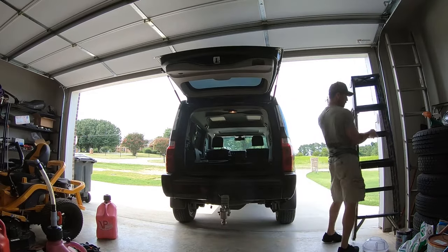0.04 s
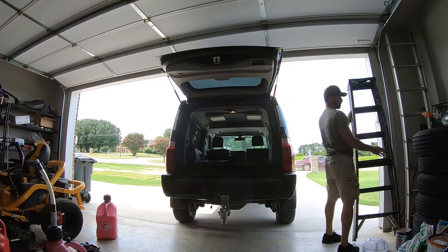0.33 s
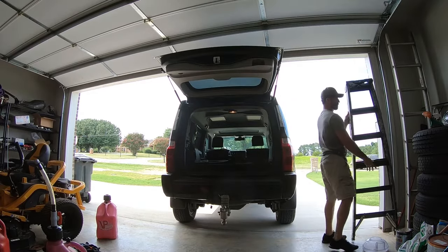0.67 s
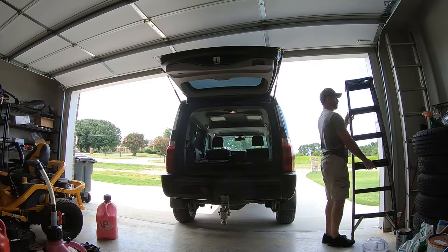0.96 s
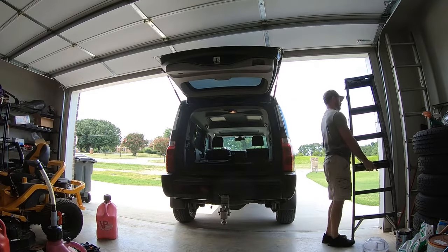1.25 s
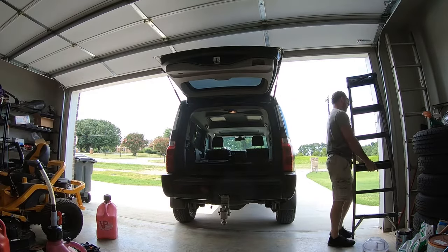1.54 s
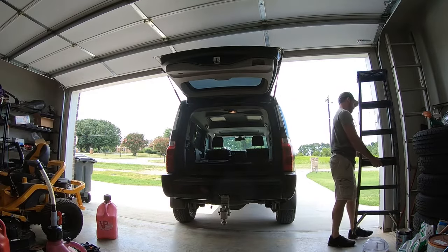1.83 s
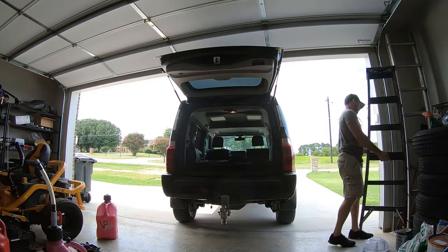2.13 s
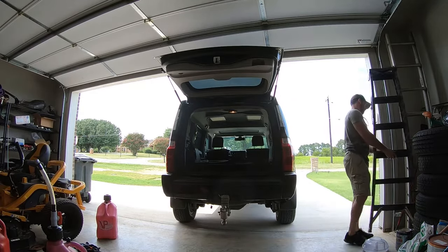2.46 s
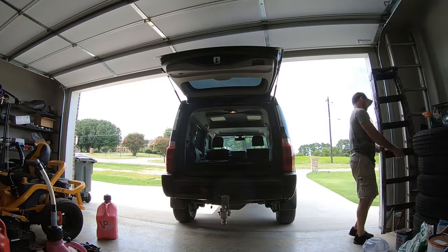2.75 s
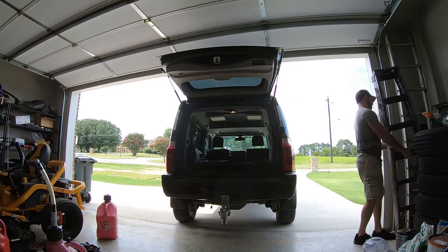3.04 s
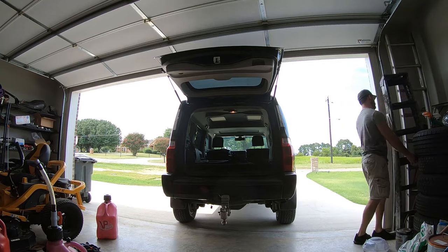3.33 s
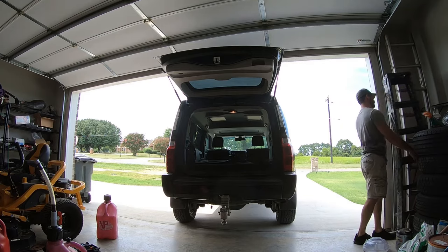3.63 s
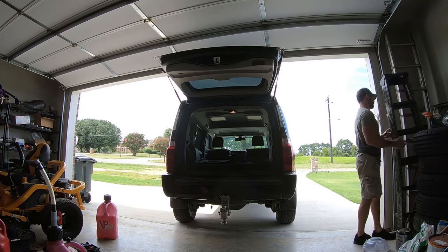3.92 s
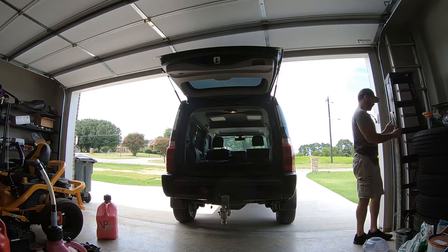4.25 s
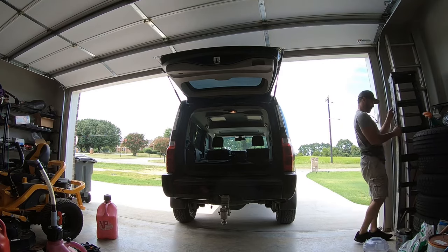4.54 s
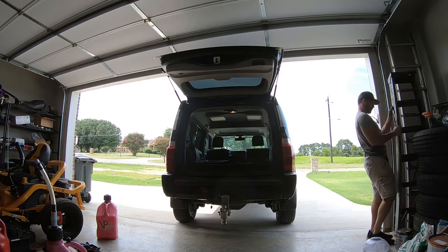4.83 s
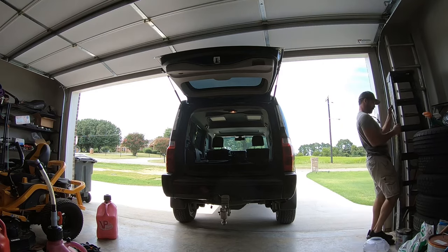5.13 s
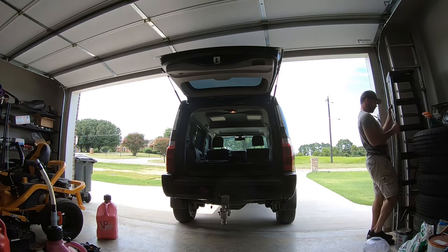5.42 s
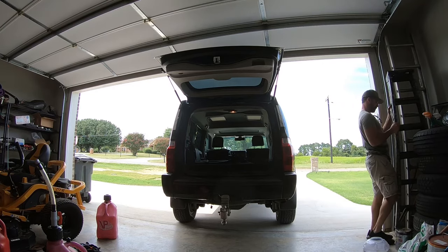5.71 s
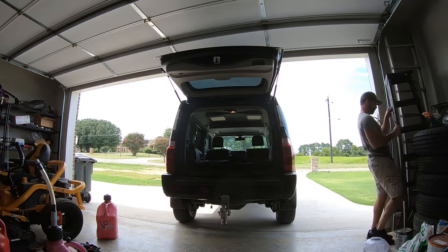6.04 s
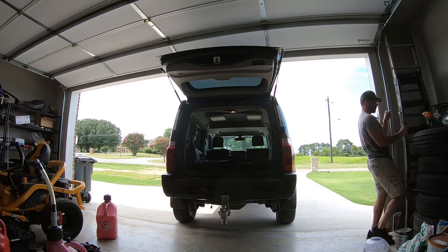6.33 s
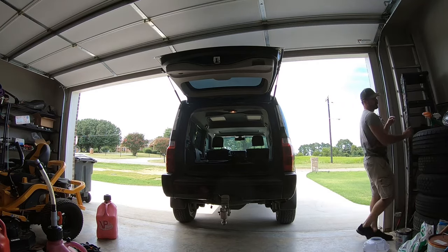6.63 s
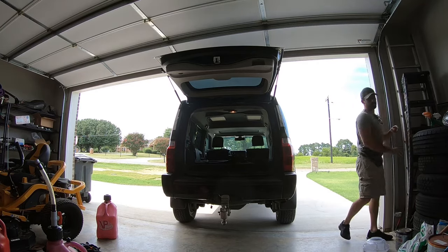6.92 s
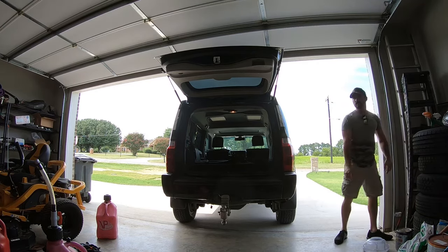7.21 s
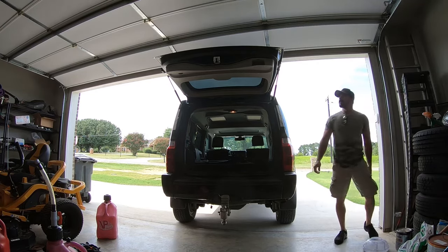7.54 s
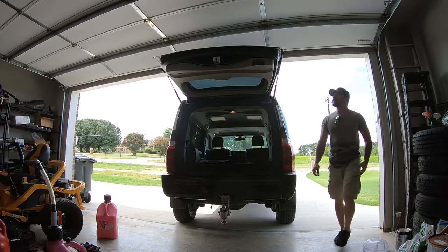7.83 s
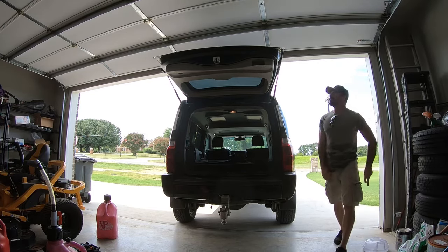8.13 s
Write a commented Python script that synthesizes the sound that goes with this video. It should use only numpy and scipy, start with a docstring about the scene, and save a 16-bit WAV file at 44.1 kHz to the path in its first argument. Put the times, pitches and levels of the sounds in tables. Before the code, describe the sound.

A vehicle is heard on the road outside an open garage, its engine and tyres fading over the first couple of seconds. Shoes scuff lightly on concrete, and at about 0.6 seconds a metal stepladder's brace snaps shut with a ringing clank. A faint scrape follows near 1.4 seconds. At 2.5 seconds the ladder's feet scrape and it knocks, then clanks hardest at 3 seconds, with two duller bumps just after. Another knock comes at 4.4 seconds, followed by brief high hinge squeaks, a scrape and clatter around 5 seconds. From 6 to 6.8 seconds the ladder is jostled into place with scrapes, a squeak and several lighter thuds. Each blow rings briefly in the bare room. Low wind buffets the microphone at about 5.2 seconds and more strongly at 6.2. A few soft shoe scuffs close it out near 8 seconds over quiet outdoor air.

```python
"""Stepladder in an open garage.

A metal stepladder is folded, carried to the wall and jostled into place. Its brace snaps shut, its
rails clank and ring, its feet scrape and a dry hinge squeaks. Shoes scuff on the concrete; the bare
room rings after each blow. Outside, a vehicle fades down the road. Wind through the door sways at
the microphone, then buffets it in later gusts."""
import sys
import numpy as np
from scipy import signal
from scipy.fft import rfft, irfft, next_fast_len
from scipy.io import wavfile
from scipy.ndimage import uniform_filter1d

SR = 44100
rng = np.random.default_rng(int(sys.argv[2]) if len(sys.argv) > 2 else 0)


def waveform_to_disk(signal):
    """Save audio, clipped to [-1, 1], as 16-bit WAV at the path in sys.argv[1]."""
    frames = np.transpose(np.atleast_2d(signal))
    scaled = np.clip(frames, -1, 1) * 32767
    samples = np.round(scaled).astype(np.int16)
    wavfile.write(sys.argv[1], SR, samples)


N = 360297
BAND_HZ = 1000 * 2 ** (np.arange(-11, 13) / 3)

# Engine, road roar, tyres. Each row: initial level in dB, fade in dB per second, wall loss in dB.
VEHICLE_LAYERS = [(-39.5, 4.5, 2), (-33.5, 3, 17), (-41.5, 3, 5.5)]
# Outdoor noise spectra. Each row: frequency in Hz, relative density in dB.
ENGINE_SPECTRUM = [(80, -4), (130, -3), (185, 3.5), (240, 7.5), (310, -4.5), (420, -6.5), (900, -51)]
ROAR_SPECTRUM = [(200, -3), (380, 1), (620, 0.5), (850, 0.5), (1150, -7), (2200, -26.5), (3200, -19.5),
                 (4200, -32.5), (5600, -29.5), (10000, -49.5), (15000, -56)]
TYRE_SPECTRUM = [(500, -60), (800, 5), (1050, 5.5), (1400, -2.5), (2000, -9.5), (3200, -17), (6000, -31.5),
                 (12000, -73)]
AIR_SPECTRUM = [(24, -28), (40, -9.5), (75, -2.5), (213, -5.5), (399, -16.5), (674, -20), (932, -21.5),
                (1430, -15.5), (1660, -22.5), (3170, -13), (4180, -22.5), (5360, -18), (6390, -24),
                (14600, -30), (15700, -34)]
BUFFET_SPECTRUM = [(24, 11.5), (45, -2.5), (62, -11), (85, -24.5), (125, -39.5), (250, -65), (600, -100)]
# Wind strength. Each row: time in seconds, relative sway in dB, relative buffeting in dB.
GUSTS = [(0.0, -48, -50), (0.11, -25.5, -49.5), (1.77, -59, -66), (2.3, -38, -71), (2.61, -64, -63),
         (4.71, -48.5, -70.5), (5.09, -25, -65), (5.16, -15.5, -28), (5.44, -21, -27), (5.48, -13.5, -34),
         (6.1, -32, -60), (6.21, -9, -20.5), (6.67, -30, -44.5), (6.85, -20, -42), (7.12, -32.5, -69.5),
         (7.51, -27, -57), (7.74, -26, -79), (8.17, -73, -60.5)]
# Friction strokes. Each row: start in seconds, length in seconds, level in dB.
SCUFFS = [(.168, .018, -48.5), (.328, 0.015, -46.5), (.772, 0.022, -48.5), (1.163, 0.02, -54),
          (1.42, 0.14, -58.5), (2.92, .06, -52), (4.13, .045, -55.5), (4.675, 0.044, -45),
          (7.372, .042, -54.5), (7.94, .04, -53.5), (8.03, 0.054, -56)]
SNAPS = [(.57, 0.011, -22)]
SCRAPES = [(1.412, 0.034, -46), (1.462, 0.03, -43.5), (2.478, 0.13, -40.5), (4.881, 0.1, -43.5),
           (5.662, 0.21, -57.5), (5.983, 0.24, -51), (6.264, 0.042, -41), (6.287, 0.13, -39.5),
           (6.49, 0.22, -52.5)]
# Friction spectra. Each row: frequency in Hz, relative density in dB.
SCUFF_SPECTRUM = [(150, -7), (600, -0.5), (1600, -2), (3200, 8.5), (4200, -2), (5600, 1), (9000, -9.5),
                  (15000, -21)]
SNAP_SPECTRUM = [(700, -11), (1170, 5), (1500, -14), (2600, -13), (3000, -2), (3450, -2), (4000, -12),
                 (5700, -7.5), (9000, -23), (15000, -40)]
SCRAPE_SPECTRUM = [(150, -34), (330, -1.5), (450, 9), (750, 5.5), (1500, 4.5), (2400, 2), (4200, -6),
                   (5500, -11.5), (9000, -18), (15000, -29.5)]
JUDDER_SPECTRUM = [(300, -29), (400, -3), (490, 2.5), (560, -3.5), (700, -33), (2000, -55)]
# Garage decay. Each row: frequency in Hz, T60 in seconds.
ROOM_T60_S = [(200, 0.72), (1000, 0.49), (3000, 0.46), (6000, 0.45), (12000, 0.46)]
# Blows on the ladder. Each row: start in seconds, relative level in dB,
# hardness (0 rubber foot, about 1 bare metal), low thud in dB.
KNOCKS = [(0.571, -25, 0.49, -12), (2.566, -27, 0.32, -14), (3.035, -22.5, 0.93, -7.5),
          (3.097, -33, 0.15, -26), (3.168, -32, 0.041, -11), (3.676, -47, 1.16, -3),
          (3.866, -48, 0.95, -21), (4.407, -27, 0.15, -18.5), (4.777, -45.5, 0.32, -21),
          (4.915, -34, 0.41, -8.5), (4.985, -32, 0.97, -15), (5.343, -49.5, 0.2, -12),
          (5.431, -49.5, 0.31, -2), (6.056, -44, 0.62, 0), (6.173, -37.5, 0.31, -15),
          (6.348, -46, 0.87, -3), (6.388, -40, 0.18, 6), (6.52, -39.5, 0.31, -11), (6.627, -32, 0, -5),
          (6.775, -51, 0.98, -11), (6.803, -42, 0.38, -16)]
# Contact colours. Each row: frequency in Hz, gain in dB.
SOFT_CONTACT = [(470, 0), (800, -4), (1400, -1), (2100, -3.5), (3000, -13), (5500, -19.5), (10000, -25.5)]
HARD_CONTACT = [(470, -5.5), (800, -4.5), (1400, 2.5), (2100, 2), (3000, 4), (5500, 3), (10000, -2.5)]
# Dense, short-lived frame modes. Each row: frequency in Hz, relative density in dB.
FRAME_SPECTRUM = [(110, -6), (210, 7.5), (320, 6), (450, 2), (700, 6), (1250, 3.5), (1800, -0.5), (2400, 0),
                  (3150, 4.5), (4000, -4.5), (5400, 0.5), (7000, -12.5), (10000, -14), (15000, -38)]
# Rail and step modes. Each row: frequency in Hz, relative level in dB, T60 in seconds.
LADDER_MODES = [(425, 3.5, .7), (462, 0, .35), (633, -.5, .55), (782, -3, .4), (841, .5, .55),
                (1206, 0, .38), (1282, -3, .4), (1350, -3, .4), (1402, -3, .4), (1472, -3, .35),
                (1587, -4, .4), (2069, -2, .38), (2353, -4, .18), (2490, -4, .18), (2666, -2, .38),
                (2709, -2, .38), (2864, -3, .35), (2975, -5, .35), (3049, -3, .42), (3578, -9, .33),
                (4200, -10, .3), (5351, -5, .26), (8750, -13, .2)]
# Hinge slips. Each row: start in seconds, length in seconds, initial pitch in Hz, level in dB.
SQUEAKS = [(4.696, 0.0087, 2410, -40), (4.705, 0.015, 2390, -29), (4.781, 0.0079, 2300, -44),
           (4.888, 0.0184, 2340, -41), (6.27, 0.062, 2270, -36.5), (6.345, 0.021, 2334, -28)]


def from_db(db):
    return 10 ** (np.asarray(db) / 20)


def unit_rms(x):
    return x / np.sqrt(np.mean(x ** 2) + 1e-20)


def decay(t, t60_s):
    return from_db(-60 * t / t60_s)


def at_hz(points, hz):
    """Interpolate on a log-frequency axis."""
    known_hz, values = np.transpose(points)
    return np.interp(np.log(np.maximum(hz, 1)), np.log(known_hz), values)


def add(out, start_s, sound):
    start = max(round(start_s * SR), 0)
    out[start:start + len(sound)] += sound[:N - start]


def butter(x, hz, kind):
    return signal.sosfilt(signal.butter(2, hz, kind, fs=SR, output="sos"), x)


def shaped(x, spectrum):
    """Apply a spectrum, rolled off below its first point; rms 1."""
    size = next_fast_len(len(x))
    hz = np.arange(size // 2 + 1) * SR / size
    gain = from_db(at_hz(spectrum, hz)) * np.minimum(hz / spectrum[0][0], 1) ** 2
    return unit_rms(irfft(rfft(x, size) * gain, size)[:len(x)])


def noise_bands(size):
    """Independent third-octave noises; unit power per kHz."""
    edge, settle = 2 ** (1 / 6), 4096
    bands = [butter(rng.standard_normal(size + settle), [hz / edge, hz * edge], "band") for hz in BAND_HZ]
    return np.array(bands)[:, settle:] * np.sqrt(SR / 2000)


def vehicle(hidden_s, hiding_s):
    """Engine, road roar and tyres recede behind the doorway's side; the wall shades the roar most."""
    out, t = np.zeros(N), np.arange(N) / SR
    hidden = (1 + np.tanh((t - hidden_s) / hiding_s)) / 2
    spectra = ENGINE_SPECTRUM, ROAR_SPECTRUM, TYRE_SPECTRUM
    for (db, fade_db_per_s, wall_db), spectrum in zip(VEHICLE_LAYERS, spectra):
        gain = from_db(db - fade_db_per_s * t - wall_db * hidden)
        out += gain * shaped(rng.standard_normal(N), spectrum)
    return out


def air(level_db):
    """Still outdoor air: steady, low noise."""
    return from_db(level_db) * shaped(rng.standard_normal(N), AIR_SPECTRUM)


def eddies(rate_hz, unrest):
    """Pressure swings as eddies of uneven size roll past; rms 1."""
    size_drift = unit_rms(butter(rng.standard_normal(N + SR), 16.8, "low")[SR:])
    phase = 2 * np.pi * np.cumsum(rate_hz * np.exp(unrest * size_drift)) / SR
    return unit_rms(np.sin(phase))


def wind(sway_gain_db, buffet_gain_db, calm_hz, gust_hz):
    """Eddies pass faster as the wind rises; the strongest gusts break into low buffeting."""
    times_s, *curves_db = np.transpose(GUSTS)
    sway_db, buffet_db = [np.interp(np.arange(N) / SR, times_s, db) for db in curves_db]
    eddy_hz = np.interp(sway_db, [-24.5, -15.5], [calm_hz, gust_hz])
    turbulence = shaped(rng.standard_normal(N), BUFFET_SPECTRUM)
    turbulence /= np.sqrt(uniform_filter1d(turbulence ** 2, size=3000) + 1e-6)   # gust alone sets level
    sway = from_db(sway_db + sway_gain_db) * eddies(eddy_hz, unrest=0.2466)
    return sway + from_db(buffet_db + buffet_gain_db) * turbulence


def stroke(length_s):
    """Half-sine swell."""
    return np.sin(np.linspace(0, np.pi, max(round(length_s * SR), 8)))


def friction(strokes, spectrum, grit_db):
    """Dense slips of uneven size under each stroke."""
    pressure = np.zeros(N)
    for start_s, length_s, db in strokes:
        add(pressure, start_s, from_db(db) * stroke(length_s))
    slips = rng.standard_normal(N)
    grit = np.repeat(rng.standard_normal(N // 64 + 1), 64)[:N]
    return pressure * shaped(slips * from_db(grit_db * grit), spectrum)


def scuffs():
    """Shoes and hands rub lightly."""
    return friction(SCUFFS, SCUFF_SPECTRUM, grit_db=3.0)


def room_decay(t, first_echo_s):
    """Tail envelope per band: builds after the first echo; bass lasts longest."""
    return decay(t, at_hz(ROOM_T60_S, BAND_HZ)[:, None]) * np.clip(t / first_echo_s - 1, 0, 1)


def garage(x, wet_db):
    """Direct sound plus the dense tail from concrete and walls."""
    t = np.arange(SR) / SR
    tail = np.sum(noise_bands(len(t)) * room_decay(t, first_echo_s=0.004), axis=0)
    return x + from_db(wet_db) * signal.fftconvolve(x, tail / np.linalg.norm(tail))[:N]


def brace_snap():
    """The spreader brace snaps shut in one short burst."""
    return friction(SNAPS, SNAP_SPECTRUM, grit_db=3.5)


def contact_colour(hardness, thud_db):
    """Harder contact is brighter; weight behind it adds a low thud."""
    blend = [(hz, db + hardness * (at_hz(HARD_CONTACT, hz) - db)) for hz, db in SOFT_CONTACT]
    return [(230, thud_db)] + blend


def stray_modes(t, colour, t60_s, count):
    """Each contact point wakes a few modes of its own."""
    hz = rng.uniform(np.sqrt(350), np.sqrt(7000), count) ** 2
    gains = from_db(at_hz(colour, hz) + at_hz(FRAME_SPECTRUM, hz)) * rng.choice([-1, 1], count)
    return gains @ np.sin(2 * np.pi * hz[:, None] * t) * decay(t, t60_s)


def knocks(clatter_db, rail_db, stray_db, room_db, soft_rise_s, hard_rise_s):
    """Each blow clatters the loose frame; the rails ring on and the room answers."""
    out, t = np.zeros(N), np.arange(SR * 11 // 20) / SR
    bands = noise_bands(N + len(t))
    mode_hz, mode_db, mode_t60_s = np.transpose(LADDER_MODES)
    lag_s = 0.012 * 200 / BAND_HZ[:, None]   # low modes build more slowly
    build = 1 - np.exp(-t / lag_s)
    rails = decay(t, mode_t60_s[:, None]) * np.exp(2j * np.pi * mode_hz[:, None] * t)
    tail = from_db(room_db) * room_decay(t, first_echo_s=0.002)
    for start_s, db, hardness, thud_db in KNOCKS:
        colour = contact_colour(hardness, thud_db)
        rivet_chatter_db = np.interp(t, t[::128], rng.normal(0, 0.5, len(t[::128])))
        rattle = unit_rms(from_db(rivet_chatter_db)) * decay(t, t60_s=0.085)
        envelope = np.hypot(rattle, tail) * build
        band_gains = from_db(clatter_db + at_hz(colour, BAND_HZ) + at_hz(FRAME_SPECTRUM, BAND_HZ))
        start = round(start_s * SR)
        clatter = band_gains @ (bands[:, start:start + len(t)] * envelope)
        scatter_db = rng.normal(0, 2.3, len(mode_hz))
        mode_gains = from_db(rail_db + mode_db + at_hz(colour, mode_hz) + scatter_db)
        phasors = np.exp(2j * np.pi * rng.random(len(mode_hz)))
        ring = np.imag(mode_gains * phasors @ rails)
        ring += from_db(stray_db) * stray_modes(t, colour, t60_s=0.49, count=14)
        rise_s = soft_rise_s * (hard_rise_s / soft_rise_s) ** hardness
        attack = 1 - np.exp(-t / rise_s)
        add(out, start_s, from_db(db) * attack * (clatter + ring))
    return out


def scrapes(ring_db, judder_match_db, judder_db_per_db):
    """Dragging feet shake the rails; under load they judder on the concrete with a hollow note."""
    t = np.arange(SR // 2) / SR
    slips = friction(SCRAPES, SCRAPE_SPECTRUM, grit_db=3.5)
    rails = sum(from_db(db) * decay(t, t60_s) * np.sin(2 * np.pi * hz * t)
                for hz, db, t60_s in LADDER_MODES)
    ring = from_db(ring_db) * signal.fftconvolve(slips, rails / np.linalg.norm(rails))[:N]
    judders = [(start_s, length_s, judder_match_db + judder_db_per_db * (db - judder_match_db))
               for start_s, length_s, db in SCRAPES]
    return slips + ring + friction(judders, JUDDER_SPECTRUM, grit_db=-2.0)


def squeaks(sag_hz, wobble_hz, overtone_db):
    """A dry hinge sticks and slips at an unsteady, sagging pitch."""
    out = np.zeros(N)
    for start_s, length_s, hz, db in SQUEAKS:
        swell = stroke(length_s)
        wobble = unit_rms(uniform_filter1d(rng.standard_normal(len(swell)), size=60))
        pitch_hz = np.linspace(hz, hz - sag_hz, len(swell)) + wobble_hz * wobble
        phase = 2 * np.pi * np.cumsum(pitch_hz) / SR
        tone = np.sin(phase) + from_db(overtone_db) * np.sin(2 * phase)
        add(out, start_s, from_db(db) * swell * tone)
    return out


def scene():
    """Ladder and shoes in the room, outdoors through the door; mono."""
    blows = knocks(clatter_db=-1.05, rail_db=-13, stray_db=-15.5, room_db=-7.5,
                   soft_rise_s=0.006, hard_rise_s=0.0023)
    hinge = garage(squeaks(sag_hz=90, wobble_hz=68.3, overtone_db=-19.5), wet_db=-7.5)
    rubbing = brace_snap() + scrapes(ring_db=-22.5, judder_match_db=-39, judder_db_per_db=2.85) + scuffs()
    outdoors = air(level_db=-62) + vehicle(hidden_s=0.8, hiding_s=0.38)
    gusts = wind(sway_gain_db=-0.5, buffet_gain_db=5.5, calm_hz=6.8, gust_hz=13)
    return (blows + hinge + garage(rubbing, wet_db=-1) + outdoors + gusts)[None]


def record(dry):
    """Steep low-pass at 15.8 kHz."""
    return signal.sosfilt(signal.ellip(10, .1, 80, 15800, fs=SR, output="sos"), dry)


dry = scene()
out = record(dry)
waveform_to_disk(out)
```